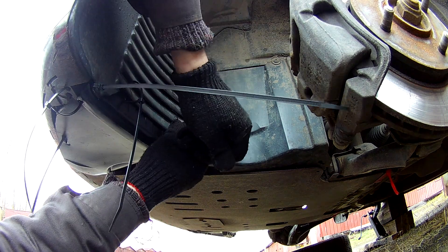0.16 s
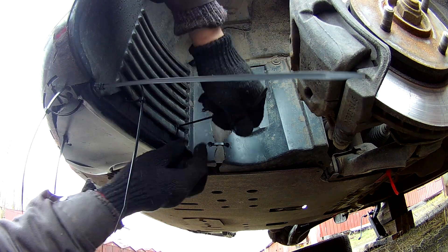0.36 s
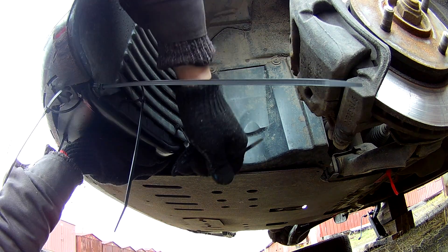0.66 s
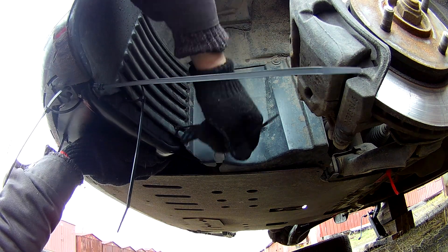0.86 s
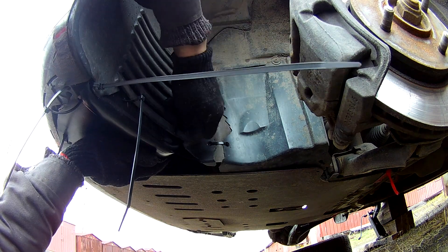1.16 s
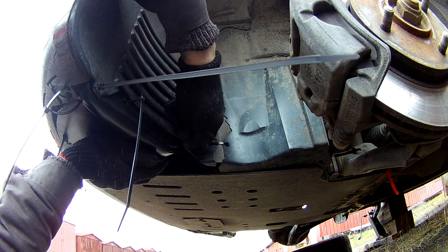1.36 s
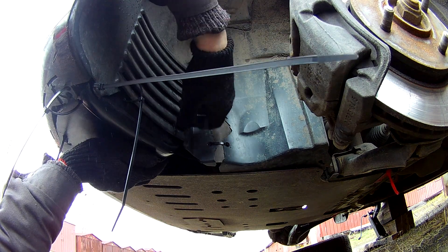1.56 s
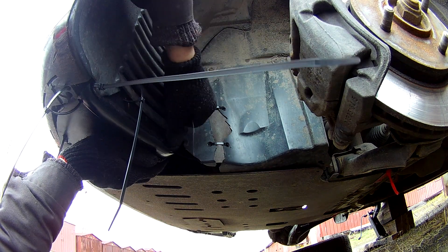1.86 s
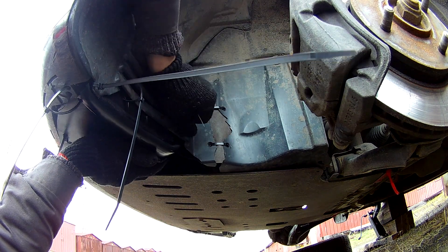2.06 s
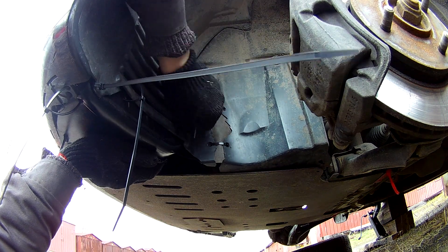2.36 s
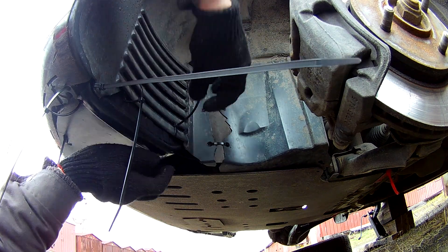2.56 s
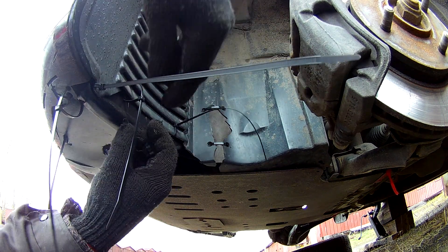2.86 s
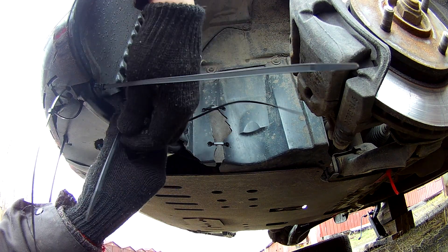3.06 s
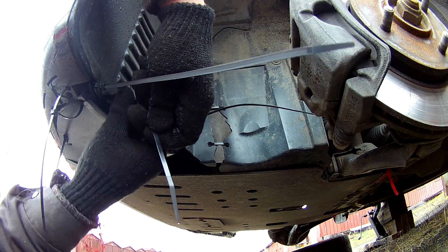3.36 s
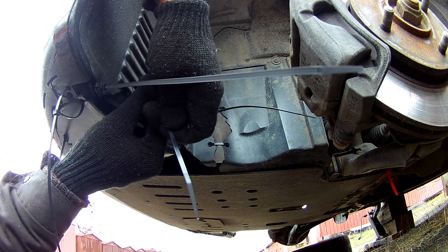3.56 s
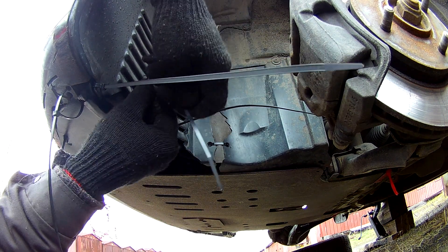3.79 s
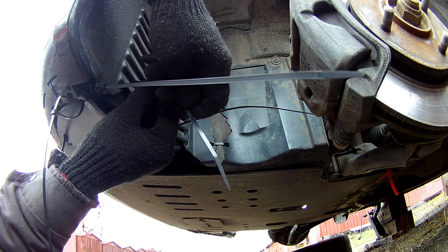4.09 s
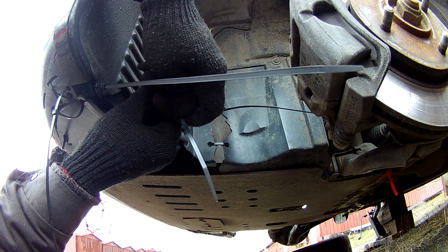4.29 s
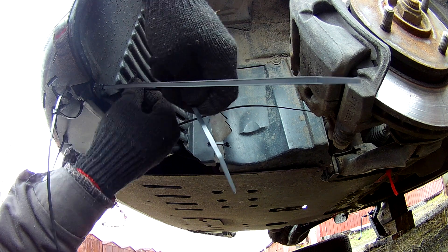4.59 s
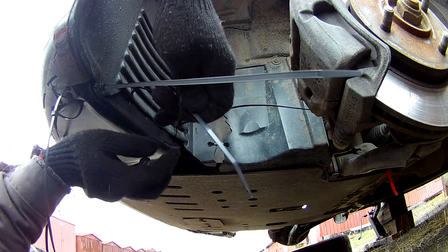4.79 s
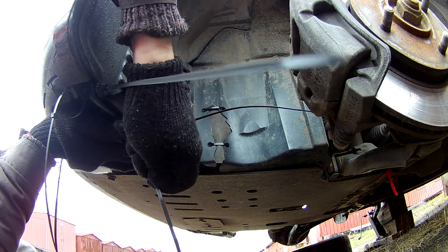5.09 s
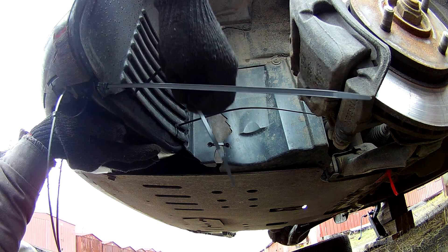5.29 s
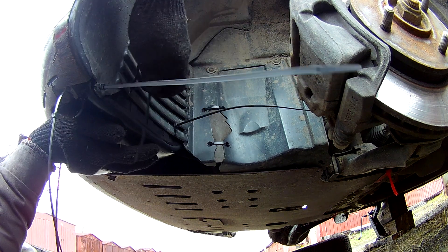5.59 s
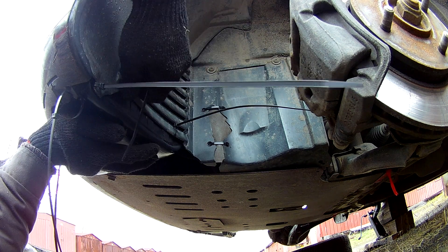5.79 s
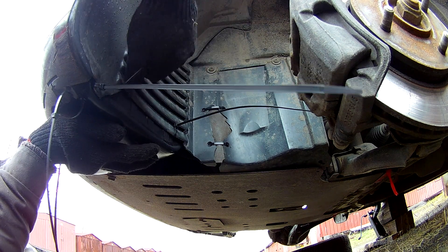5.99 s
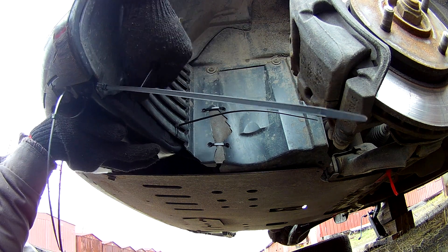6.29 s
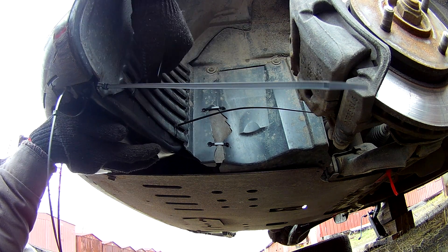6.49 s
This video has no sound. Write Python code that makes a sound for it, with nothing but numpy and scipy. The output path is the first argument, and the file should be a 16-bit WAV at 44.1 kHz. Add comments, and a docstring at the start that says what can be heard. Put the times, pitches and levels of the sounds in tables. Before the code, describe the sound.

Close plastic snaps and drum-like panel knocks in irregular bursts, with rubbing sleeves, brief rasps, a tiny squeak and faint distant sparrow chirps outdoors.

```python
"""Gloved hands thread ribbed plastic zip ties through a car's wheel-arch liner, outdoors, near a small camera.
From the start, ties catch and slip: each slip knocks the thin panel over rumble, hum, rubbing sleeves and taps.
A sparrow chirps early and three times later; short scrapes begin after half a second; the hum climbs to 3 s.
At 4.4 s a tie squeaks through its hole by fast stick-slip, then more tugs and knocks follow until the end.
Knocks are noise shaped by panel resonances; the hum, chirps and squeak are sines; rumble and cloth are noise."""
import sys
import numpy as np
from scipy import signal
from scipy.fft import rfft, irfft
from scipy.io import wavfile
from scipy.ndimage import uniform_filter1d

SR = 44100
rng = np.random.default_rng(int(sys.argv[2]) if len(sys.argv) > 2 else 0)


def unload_audio(sound):
    """Save the sound as a 16-bit wav file, at the path given as the first command line argument."""
    columns = np.transpose(np.atleast_2d(sound))
    # keep every value between -1 and 1, then stretch to whole-number steps
    steps = np.round(np.clip(columns, -1, 1) * 32767)
    wavfile.write(sys.argv[1], SR, steps.astype(np.int16))


N = 292824
TIME = np.arange(N) / SR
SIZE = 8192  # samples in the response to one knock
LEAD = 128  # samples kept free ahead of each knock
FREQ = np.fft.rfftfreq(SIZE, 1 / SR)

# The levels of the work on the liner are set ahead of the microphone port;
# the background does not pass through it.
# colour of the distant outdoor noise: [pitch_hz, level_db]
OUTDOOR_COLOUR = [(12, -46), (20, -5), (48, 2), (134, -2.5), (154, -4), (193, -7), (255, -12.5), (328, -11),
                  (459, -45), (513, -16), (1060, -19.5), (2020, -42), (2460, -40.5), (3250, -50.5),
                  (16000, -49)]
# a low distant hum climbs, then settles and fades: [time_s, pitch_hz, level_db]
HUM_PATH = [(0, 53.5, -53.5), (2.098, 72.25, -54), (3.001, 87.07, -54), (3.4, 85.2, -61), (6.6, 84.1, -68)]
# sparrow chirps: [start_s, length_s, top_pitch_hz, peak_db before the yard echo is mixed in]
CHIRPS = [(0.263, 0.042, 5040, -59), (2.045, 0.051, 5100, -67), (2.954, .05, 4700, -74),
          (4.123, 0.054, 4850, -64.5)]
# colour of cloth on the liner: [pitch_hz, level_db]
CLOTH_COLOUR = [(120, -33), (200, -1), (372, -3.5), (473, -4.5), (1230, -15.5), (2950, -33.5),
                (3630, -31.5), (4120, -34.5), (9000, -48), (11700, -67), (19800, -120)]
# an arm reaches in or draws back, and the rub swells or eases: [fullest_s, change_db]
REACHES = [(0.66, 5), (2.62, 9), (3.96, -0.5), (5.2, -2.5), (6.23, 0)]
# each new hold changes the drum mode, the two pitches of the free part of the panel, and how bare
# the tie is: [start_s, drum_mode_db, low_ring_hz, high_ring_hz, highest_treble_db]
HOLDS = [(0, 4, 490, 2110, 1.5), (.62, 9, 1120, 1696, 3), (1.0, 2.5, 566, 1550, 5),
         (1.4, 2.5, 713, 1465, -2), (2.48, 4.5, 484, 1363, 0), (3.4, -16.5, 323, 1190, 0),
         (4.2, -17, 575, 1350, 1.5), (4.8, -6.5, 625, 993.4, -8.5), (5.19, -27, 286, 1500, -3),
         (5.5, -0.5, 853, 1163, -4.5), (5.7, -16, 251, 1063, -8), (6.4, -1.5, 247, 1142, -6.5)]
# strong panel resonances, drum mode first: [pitch_hz, width_hz, level_db over the dense modes]
PANEL_MODES = [(385.3, 29.8, 8.5), (177, 24, 2.5), (263.4, 30, -3), (496, 28, -10), (731, 13, -8.5),
               (886, 38, 1.5), (1175, 9.4, 0.5), (1420, 31, 0), (1590, 16, -6), (1750, 96, -2.5),
               (1960, 70, 3.5), (2416, 50, 5), (3300, 83, 1), (3650, 22, 2)]
# colour of a knock on the panel: [pitch_hz, level_db]
PANEL_COLOUR = [(40, -25.5), (80, -6), (170, 1), (260, 8), (390, 7.5), (560, 3), (900, 2), (1600, 1.5),
                (2200, -5), (2700, -12), (3700, -11), (5000, -19), (7000, -25.5), (16000, -53.5)]
# time in which the many dense modes fade by 60 dB: [pitch_hz, fade_s]
RING_TIMES = [(150, 0.19), (400, 0.11), (1000, 0.07), (2000, 0.05), (5000, 0.039), (12000, 0.011)]
# a tie or a sleeve scrapes along the liner: [start_s, length_s, level_db, thump_db, brightness_db_per_octave]
SCRAPES = [(0.555, 0.041, -49.5, 5, -1), (0.648, 0.11, -51.5, -7, -6.5), (0.932, 0.11, -51, 4, -6.5),
           (1.553, 0.18, -54, 8.5, -2.5), (2.561, 0.26, -49.5, 1, -14), (3.828, 0.077, -40, 13.5, -2.5),
           (4.013, 0.0398, -41, 11.5, -3.5), (4.397, 0.039, -36.5, -2, -2), (4.459, 0.043, -44, 8, -1),
           (4.51, 0.046, -36.5, 7.5, -6.5), (4.933, 0.079, -36.5, 18, 1.5), (5.271, 0.15, -38, 2, -2.5),
           (5.93, 0.081, -41, 11.5, -1.5)]
# a tie squeaks through its hole: [time_s, slip_rate_hz, pull_db before the tone and knock trims]
SQUEAK_PATH = [(4.404, 630, -48), (4.409, 665, -33), (4.418, 685, -33), (4.428, 700, -37),
               (4.443, 712, -35), (4.454, 650, -37), (4.465, 520, -38), (4.476, 400, -50)]
# the tie's own tone: one entry per harmonic of the slip rate [level_db]
SQUEAK_HARMONICS = [-3.5, -3, -15, -21, -36, -20, -25, -23, -19.5]
# a tie catches and lets go once:
# [start_s, level_db over 20 ms, thump_db, brightness_db_per_octave, snap_db]
CLICKS = [(0.0655, -53.5, -18, -2.5, 12), (0.1313, -41, -10, -2, 2), (0.3099, -28, 5.5, 4, -10),
          (0.565, -42.5, 15.5, -3, 1), (1.123, -27, -8, -4, 7), (1.1793, -31, -11, 2, 1),
          (1.2314, -33.5, 3.5, -8.5, -17), (1.54, -46, -6, -10, -1), (1.554, -36.5, -1.5, -4.5, -1),
          (2.0033, -32.5, 5, 1, -14), (2.4232, -45.5, -12, -4.5, 3), (2.527, -22, -5, -7, 0.5),
          (2.7091, -35, 10, -2.5, -3.5), (3.086, -46.5, 8.5, -1, 1), (3.6844, -34, -6.5, -4, 3),
          (3.9279, -38.5, 3, -7, -3), (4.3407, -46, -0.5, -7, 3), (4.5764, -28, 3.5, -6, -3),
          (4.968, -29, 2, -7, -7), (5.037, -31.5, 14, 0.5, 2), (5.2544, -40.5, 0, -0.5, 11.5),
          (5.3238, -28.5, 1.5, 2, 11.5), (5.826, -31.5, 0, -4, -3), (6.208, -43.5, 14, -11, 10)]
# a tug draws several teeth over an edge: [start_s, teeth_count, first_gap_s, gap_ratio (each over the last),
# level_db over 20 ms, step_db per tooth, thump_db, brightness_db_per_octave, snap_db]
TUGS = [(0.138, 3, 0.032, 1.33, -27, 0.5, 4, 3.5, -7), (0.7549, 3, 0.022, 1.09, -25, 0, 2, 3, -5),
        (1.1581, 3, 0.0073, 0.51, -22, 0, -2.5, 0.5, 3), (1.186, 2, .013, 1, -19, -7.5, -4.5, -0.5, 2.5),
        (2.2605, 3, 0.03, 1.02, -39, 3.5, -4, -6.5, -6),
        (3.7653, 5, 0.04, 0.66, -30.5, -2, -2.5, -8.5, 7.5), (4.033, 2, 0.039, 1, -42, 5, 1.5, -12, 11),
        (4.4651, 2, 0.012, 1, -31, -0.5, 0, -18, -3), (4.938, 3, 0.022, 1.62, -28.5, -1, 12, -7.5, 0),
        (5.076, 4, .022, 0.66, -25.5, 0.5, 11, 2.5, 2), (5.274, 4, .013, 1.1, -27.5, 0.05, -3, -4.5, 0),
        (5.3568, 2, .0116, 1, -31.5, 0, -4, -1.5, 3), (5.395, 3, .018, 1.27, -33, 1.2, -0.5, -1, -0.5),
        (5.5495, 2, .0437, 1, -18.5, -8.5, -4, -5, 4.5), (5.939, 2, 0.029, 1, -30.5, -0.5, 10.5, -5.5, 7),
        (6.5543, 3, 0.028, 0.98, -24, -0.5, 0.5, -3.5, 6.5)]
# treble dips and peaks of the microphone port: [pitch_hz, level_db]
PORT_COLOUR = [(5000, -0.5), (7300, -1.5), (7750, -14.5), (8050, -24), (8400, -5.5), (8800, -2),
               (10200, -4), (11800, 4), (13400, 4.5), (14500, -3)]


def undb(db):
    """Turn decibels into a gain."""
    return 10 ** (np.asarray(db) / 20)


def unit(x):
    """Scale a sound to an rms level of 1."""
    return x / np.sqrt(np.mean(x ** 2) + 1e-20)


def along(hz, points):
    """Read a curve of (Hz, value) points, with straight lines on a log-frequency axis."""
    point_hz, value = np.transpose(points)
    return np.interp(np.log(np.maximum(hz, 1)), np.log(point_hz), value)


def colour(x, points):
    """Filter a sound by a (Hz, dB) curve."""
    gain = undb(along(np.fft.rfftfreq(len(x), 1 / SR), points))
    return irfft(rfft(x) * gain, len(x))


def walk(rate):
    """Smooth random wandering with a spread near 1 and `rate` new values a second."""
    k = int(SR / rate)
    steps = np.repeat(rng.standard_normal(N // k + 1), k)
    return 0.87 * uniform_filter1d(steps, k)[:N]


def add(out, s, x):
    """Mix x into out at time s."""
    i = int(round(s * SR))
    out[i:i + len(x)] += x[:max(N - i, 0)]


def outdoors(level_db=-51.5, swell_db=1):
    """Low distant rumble with a thin hiss on top: coloured noise whose level wanders slowly."""
    return unit(colour(rng.standard_normal(N), OUTDOOR_COLOUR)) * undb(level_db + swell_db * walk(3.09))


def hum(waver=0.041, flutter_db=2):
    """A faint low sine that wavers, climbs in pitch, then settles and fades."""
    s, hz, db = np.transpose(HUM_PATH)
    pitch = np.interp(TIME, s, hz) * (1 + waver * walk(12))
    level = undb(np.interp(TIME, s, db) + flutter_db * walk(4.3))
    return np.sqrt(2) * np.sin(2 * np.pi * np.cumsum(pitch) / SR) * level


def sparrow(sag=0.148, warble=0.067, yard_t60=0.34, yard=0.57):
    """Short chirps that arch in pitch, some way off, blurred by the walls of the yard."""
    out = np.zeros(N)
    for s, length, hz, db in CHIRPS:
        u = np.linspace(-1, 1, int(length * SR))  # from start to end of the chirp
        pitch = hz * (1 - sag * u ** 2 + warble * walk(900)[:len(u)])
        tone = np.sin(2 * np.pi * np.cumsum(pitch) / SR)
        add(out, s, undb(db) * np.cos(u * np.pi / 2) * tone)
    walls = rng.standard_normal(SIZE) * undb(-60 * np.arange(SIZE) / SR / yard_t60)
    echo = signal.fftconvolve(out, walls / np.linalg.norm(walls))[:N]
    return (out + yard * echo) / np.hypot(1, yard)


def hold_at(s):
    """Find the index of the hold that the hands have at time s."""
    return max(np.searchsorted(np.array(HOLDS)[:, 0], s) - 1, 0)


def resonances(s, quality=13, low_db=6, high_db=7.5, scatter_db=2):
    """Strong modes of the panel as the hands hold it at time s, each a peak in the spectrum."""
    _, drum_db, low_hz, high_hz, _ = HOLDS[hold_at(s)]
    free_part = [(low_hz, low_hz / quality, low_db), (high_hz, high_hz / quality, high_db)]
    modes = list(PANEL_MODES) + free_part
    weight_db = scatter_db * rng.standard_normal(len(modes))
    weight_db[0] += drum_db
    total = 0
    for extra_db, (hz, width, db) in zip(weight_db, modes):
        total = total + undb(db + extra_db) / (1 + 2j * (FREQ - hz) / width)
    return total


def dense_modes(direct=0.26, crisp_hz=7000, echo=0.33, echo_s=.0045, arch_db=-28, arch_t60=0.12):
    """Spectrum of one knock: a wavefront, its echo off the wheel arch, many short modes and a faint ring."""
    t = np.arange(SIZE) / SR
    noise, tail = rfft(rng.standard_normal(SIZE)), 0
    centres = np.array(RING_TIMES)[:, 0]
    # overlapping bands of noise, each with its own fade
    for share, (_, t60) in zip(np.eye(len(centres)), RING_TIMES):
        fade = undb(-60 * t / t60) + undb(arch_db - 60 * t / arch_t60)
        fade = fade * (1 - np.exp(-t / 0.0013))  # the modes take a moment to build up
        band = irfft(noise * along(FREQ, np.c_[centres, share]))
        tail = tail + band * fade / np.linalg.norm(fade)
    # the highest treble dies in the plastic and comes mostly straight from the tie
    front = direct * (1 + np.minimum(FREQ / crisp_hz, 1.4) ** 2)
    bounce = echo * np.exp(-2j * np.pi * FREQ * echo_s * rng.uniform(.8, 1.2))
    return front + bounce + rfft(tail)


def panel(s, dense, thump_db, bright_db, snap_db, travel_s=0.00292):
    """Response of the liner to one slip at time s, with energy 1."""
    body = dense + resonances(s)
    # the modes share out the energy that the slip puts into each octave
    total, k = np.cumsum(abs(body) ** 2), np.arange(len(FREQ))
    low = (k / np.sqrt(2)).astype(int)
    high = np.minimum((k * np.sqrt(2)).astype(int) + 2, k[-1])
    body = body / np.sqrt((total[high] - total[low]) / (high - low))
    db = along(FREQ, PANEL_COLOUR)
    # a flexing panel thumps, a tooth of the tie snaps, a hard edge is bright
    db = db + along(FREQ, [(150, 1.19 * thump_db), (350, thump_db), (800, 0.021)])
    db = db + along(FREQ, [(4000, 0.023), (6000, snap_db)])
    db = db + bright_db * np.log2(np.clip(FREQ, 1000, 4000) / 1000)
    # a glove over the tie shades the highest treble, a bare tie lets it out
    db = db + along(FREQ, [(7000, 0), (8500, HOLDS[hold_at(s)][-1])])
    # bending waves: the lows travel slower and arrive later
    delay = travel_s * np.maximum(np.sqrt(1000 / np.maximum(FREQ, 250)) - .5, 0)
    phase = 2 * np.pi * np.cumsum(delay) * SR / SIZE
    response = np.roll(irfft(body * undb(db) * np.exp(-1j * phase)), LEAD)
    return response / np.linalg.norm(response)


def rub_db(rest_db=-57, rise_s=0.16, fall_s=0.26):
    """How hard the sleeves rub: a resting level, with a quick change and slower return at each reach."""
    level = np.full(N, float(rest_db))
    for s, db in REACHES:
        level += db * np.exp(np.minimum((TIME - s) / rise_s, (s - TIME) / fall_s))
    return level


def sleeves(flicker_db=2, nudge_rate=12, nudge_db=-7, spread_db=3.0, soft_hz=520):
    """Cloth brushes unevenly along the liner, and gloved fingers keep nudging it softly."""
    cloth = unit(colour(rng.standard_normal(N), CLOTH_COLOUR)) * undb(flicker_db * walk(35))
    nudges = (rng.random(N) < nudge_rate / SR) * undb(spread_db * rng.standard_normal(N))
    # a padded touch lasts too long to excite the treble
    nudges = signal.sosfilt(signal.butter(2, soft_hz, fs=SR, output="sos"), nudges)
    body = signal.fftconvolve(nudges, panel(0, dense_modes(), 0, 0, 0))[:N]
    return (cloth + undb(nudge_db) * unit(body)) * undb(rub_db())


def ticks(rate=2, level_db=-55, spread_db=2, thump_db=-2, bright_db=-7, snap_db=5.0):
    """Loose ends of the ties tap the liner faintly, at random moments about `rate` times a second."""
    taps = (rng.random(N) < rate / SR) * undb(level_db + spread_db * rng.standard_normal(N))
    knock = panel(0, dense_modes(), thump_db, bright_db, snap_db)
    return signal.fftconvolve(taps, knock)[:N] * np.sqrt(.02 * SR)  # level over 20 ms


def scrapes(rate=600, spread_db=4, snap_db=-0.5):
    """A tie or a sleeve scrapes along the liner: dense tiny slips of uneven size shake the panel."""
    out = np.zeros(N)
    for s, length, db, thump_db, bright_db in SCRAPES:
        n = int(length * SR)
        sizes = rng.choice([-1, 1], n) * undb(spread_db * rng.standard_normal(n))
        tiny_slips = (rng.random(n) < rate / SR) * sizes
        tiny_slips = unit(tiny_slips * signal.windows.tukey(n, .5))
        response = panel(s, dense_modes(), thump_db, bright_db, snap_db)
        add(out, s - LEAD / SR, undb(db) * signal.fftconvolve(tiny_slips, response))
    return out


def squeak(jitter=0.036, rough=1.0, slips_db=-4, tone_db=1.0, waver=0.0067,
           thump_db=-4, bright_db=-2, snap_db=8):
    """Fast, nearly regular stick-slip: the tie sings, rising then falling, and its slips shake the panel."""
    s, hz, db = np.transpose(SQUEAK_PATH)
    rate = np.interp(TIME, s, hz) * (1 + waver * walk(400))
    pull = np.interp(TIME, s, undb(db), left=0, right=0)
    cycles = np.cumsum(rate) / SR
    tone = np.zeros(N)
    for k, level_db in enumerate(SQUEAK_HARMONICS, 1):
        tone += undb(level_db) * np.sin(2 * np.pi * (k * cycles + rng.random()))
    # one slip per cycle, uneven in timing and size
    fast_slips = np.diff(np.floor(cycles + jitter * walk(700)), prepend=0)
    fast_slips = fast_slips * (1 + rough * rng.standard_normal(N))
    response = panel(s[0], dense_modes(), thump_db, bright_db, snap_db)
    shaken = signal.fftconvolve(unit(fast_slips) * pull, response)[LEAD:LEAD + N]
    return undb(tone_db) * pull * tone + undb(slips_db) * shaken


def slips():
    """List the lone slips and the teeth of each tug, whose gaps and levels change steadily."""
    rows = list(CLICKS)
    for s, teeth, gap, gap_ratio, db, step_db, *tone in TUGS:
        for k in range(int(round(teeth))):
            rows.append((s, db + k * step_db, *tone))
            s = s + gap * gap_ratio ** k
    return rows


def clicks(shift=0.64, uneven_db=1):
    """Slips of a tie knock the panel; within one hold they strike nearly the same place and ring alike."""
    out, places = np.zeros(N), [dense_modes() for _ in HOLDS]
    for s, db, thump_db, bright_db, snap_db in slips():
        # shift blends the shared place with a fresh one
        dense = np.cos(shift) * places[hold_at(s)] + np.sin(shift) * dense_modes()
        flex_db, tooth_db = uneven_db * rng.standard_normal(2)
        knock = panel(s, dense, thump_db + flex_db, bright_db, snap_db + tooth_db)
        add(out, s - LEAD / SR, knock * undb(db) * np.sqrt(.02 * SR))  # level over 20 ms
    return out


def scene():
    """The work on the liner, heard through the microphone port, over the outdoor background."""
    background = outdoors() + hum() + sparrow()
    work = sleeves() + ticks() + scrapes() + squeak() + clicks()
    return (background + colour(work, PORT_COLOUR))[None]


def record(dry, top_hz=15900):
    """The camera cuts the highest treble with a steep low-pass filter."""
    return signal.sosfilt(signal.ellip(10, .1, 70, top_hz, fs=SR, output="sos"), dry)


dry = scene()
out = record(dry)
unload_audio(out)
```